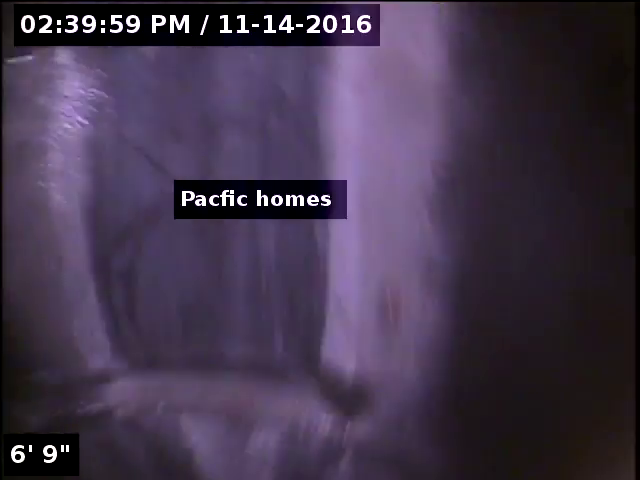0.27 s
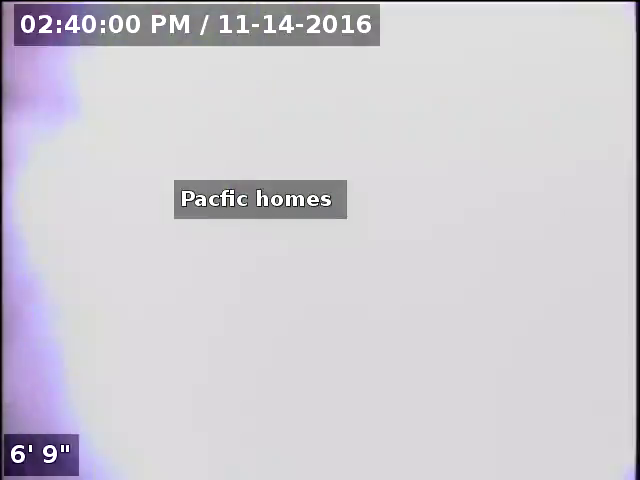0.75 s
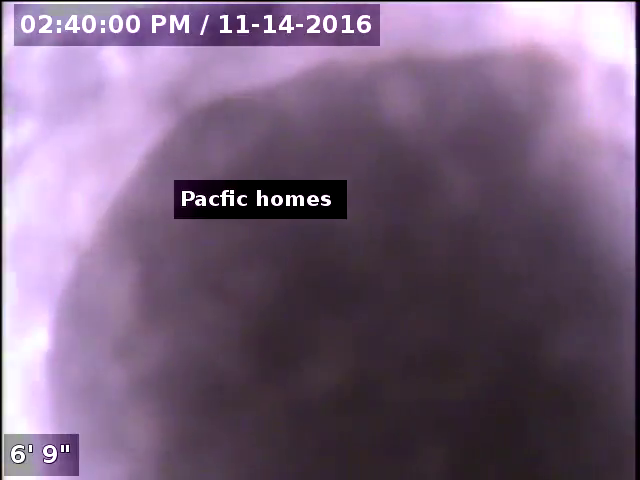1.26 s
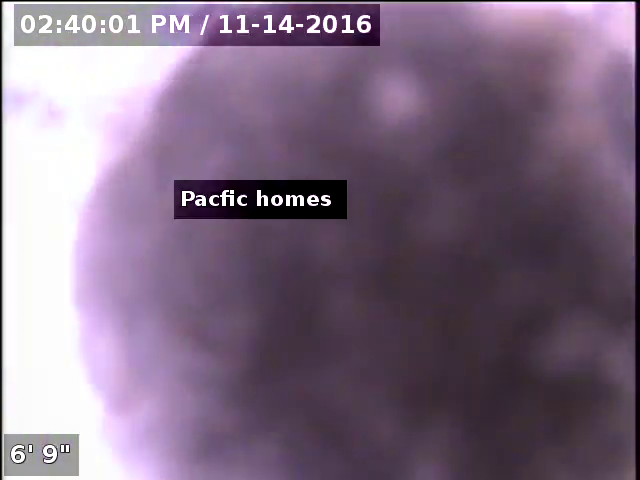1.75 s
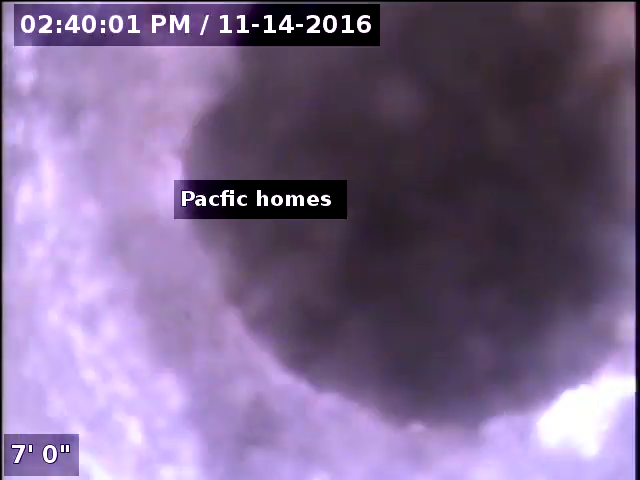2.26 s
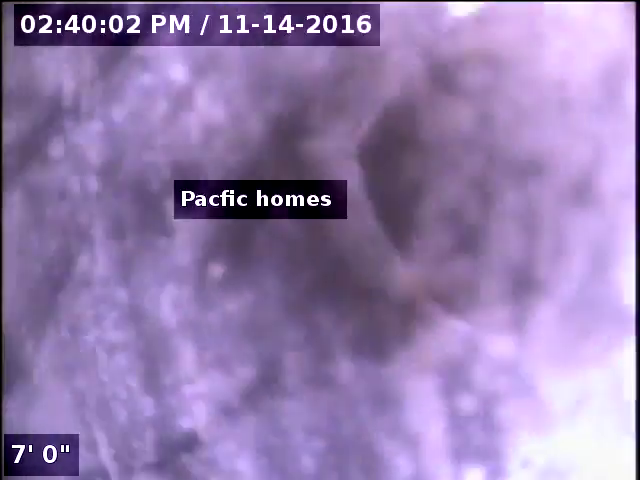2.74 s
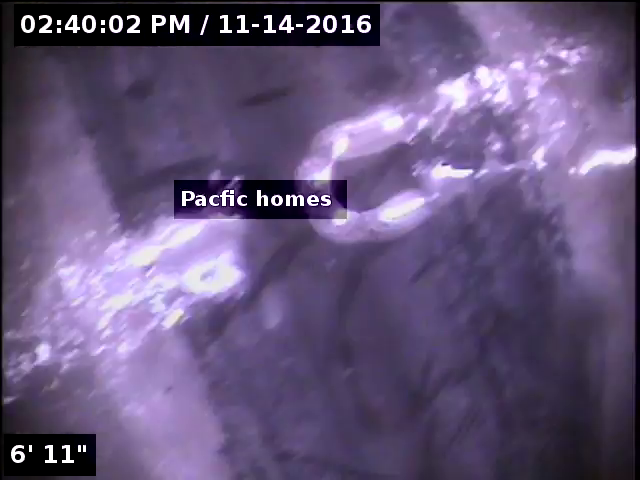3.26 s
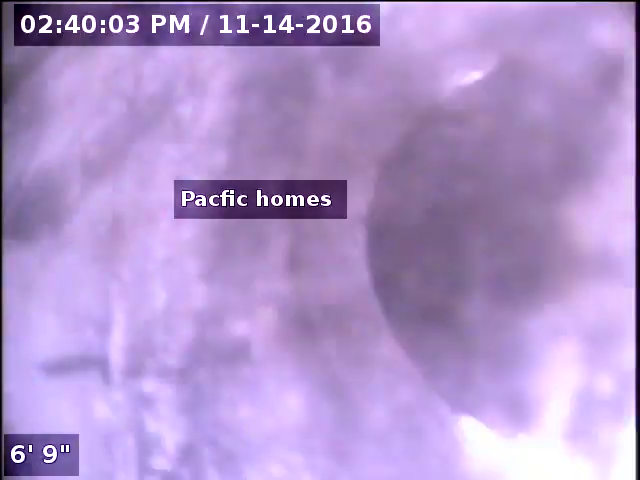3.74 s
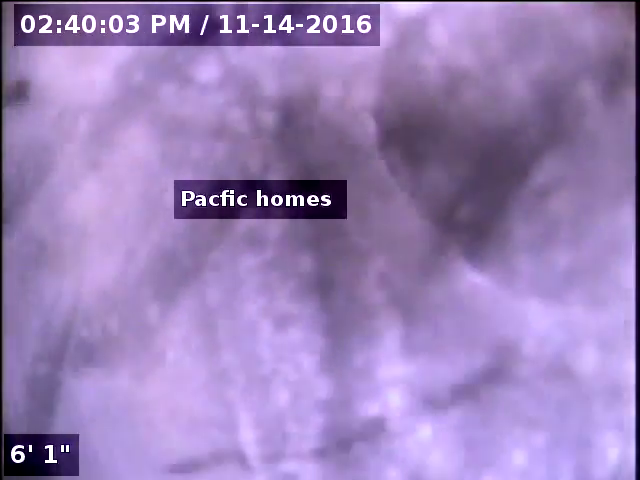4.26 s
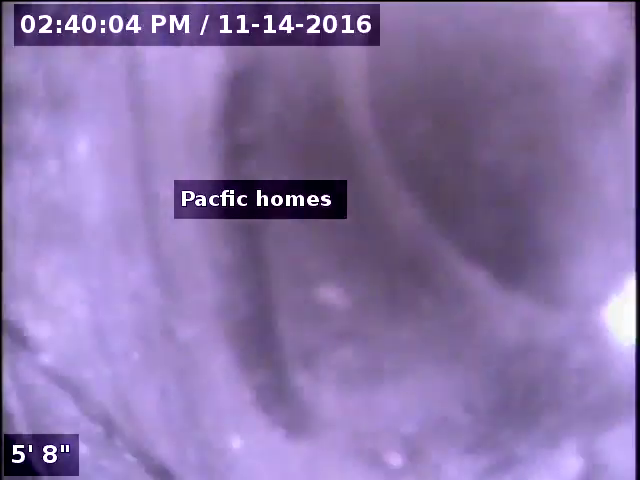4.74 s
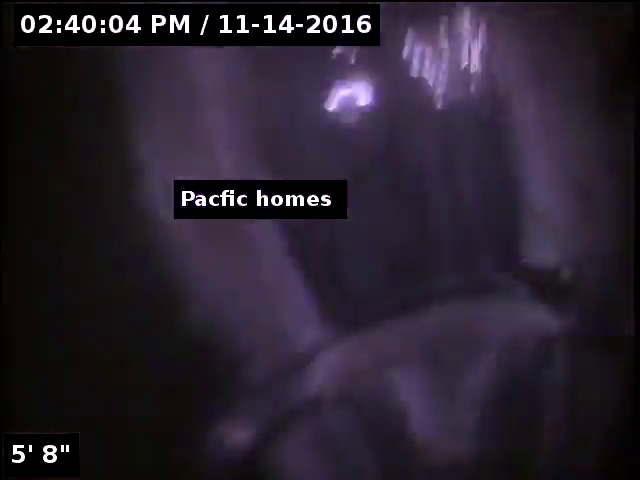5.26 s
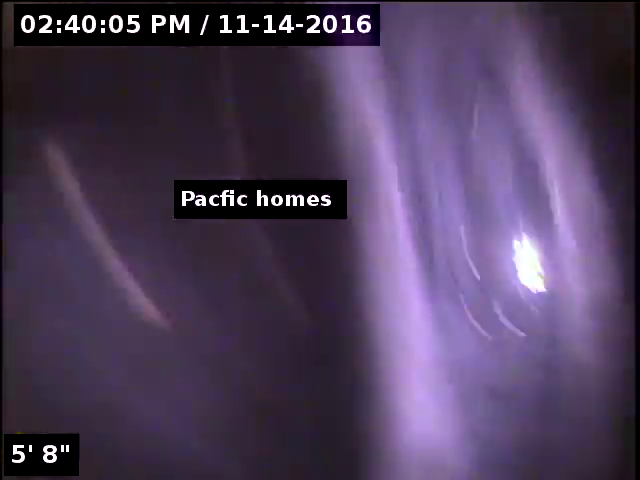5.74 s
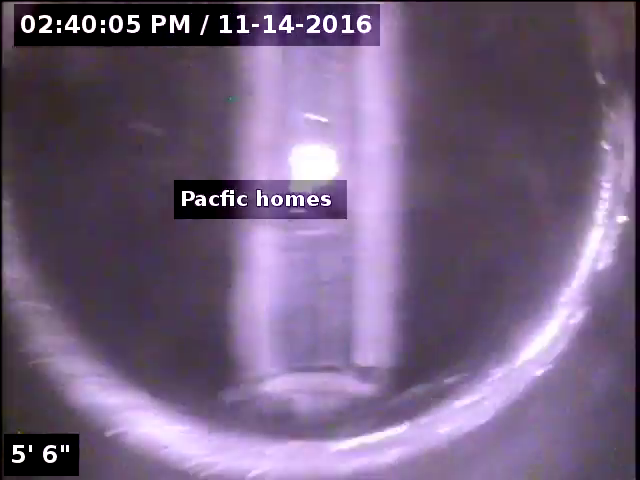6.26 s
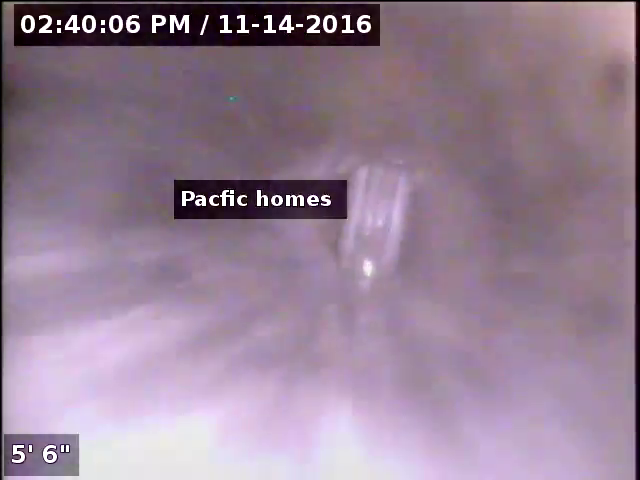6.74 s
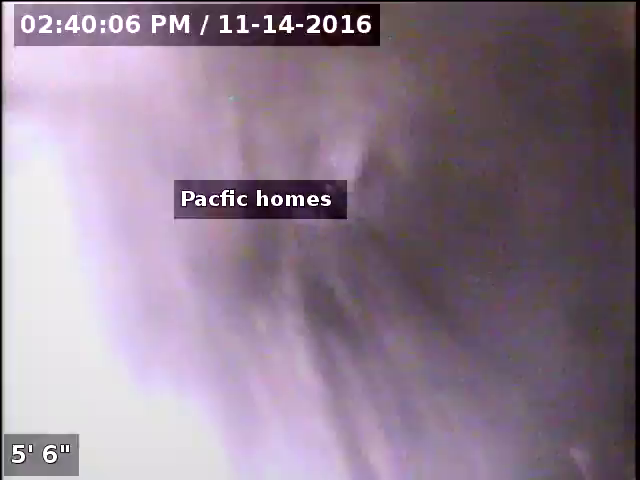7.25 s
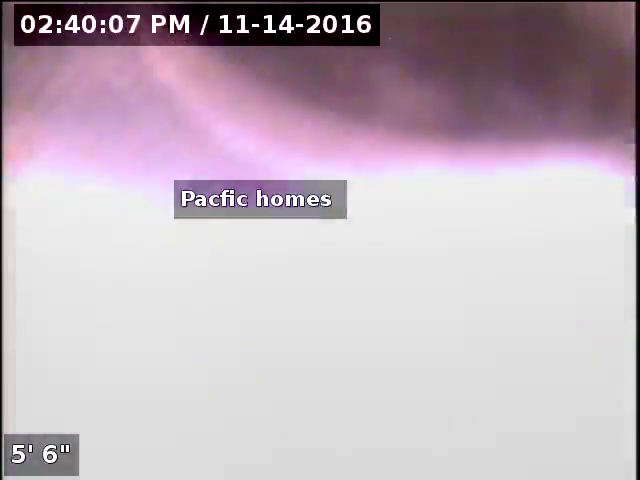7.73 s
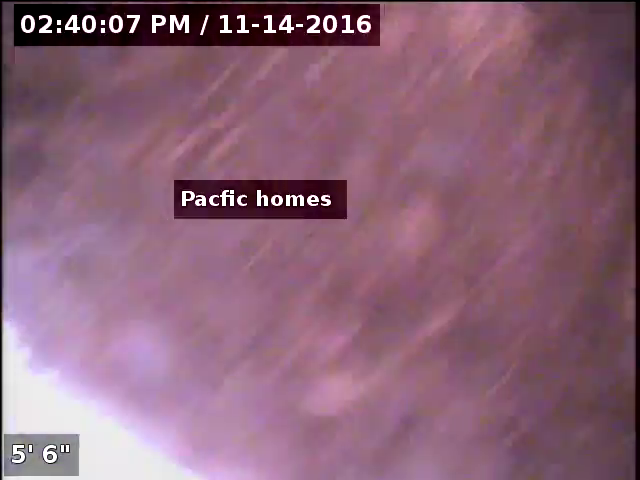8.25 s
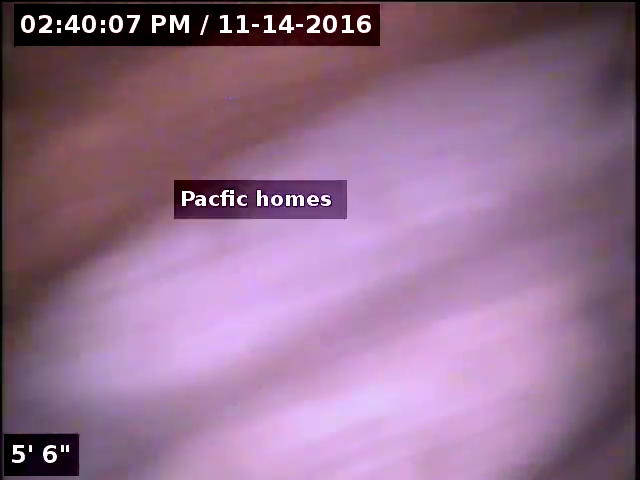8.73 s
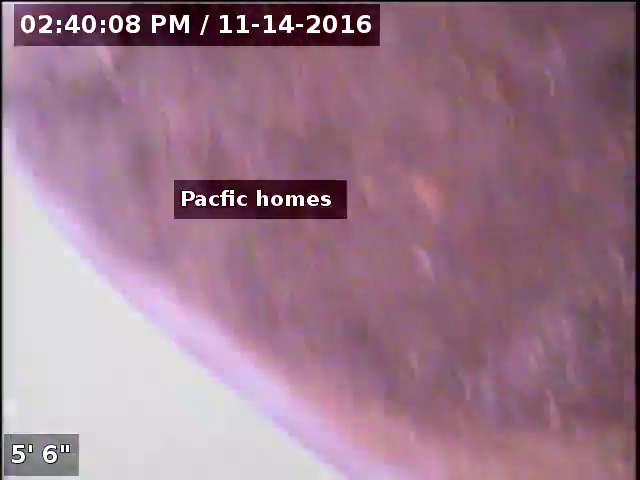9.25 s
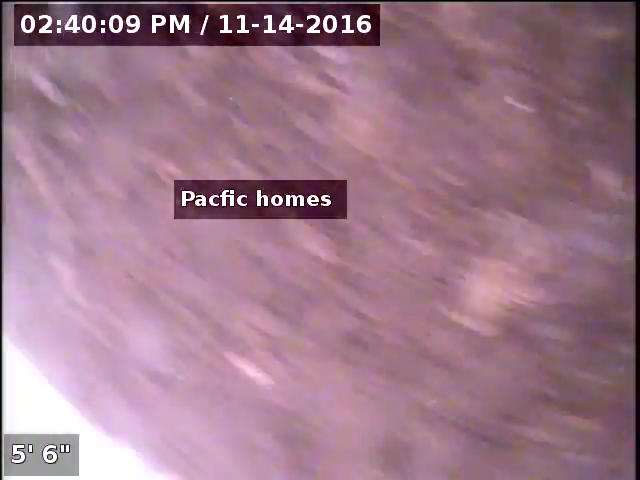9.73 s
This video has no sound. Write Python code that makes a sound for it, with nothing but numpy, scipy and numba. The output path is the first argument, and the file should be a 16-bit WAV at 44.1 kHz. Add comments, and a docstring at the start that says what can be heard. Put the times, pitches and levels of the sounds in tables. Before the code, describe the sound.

An inspection camera on a push cable is dragged through a drain pipe. It scrapes and rattles in short, uneven tugs, with sharp hollow knocks and small cable clicks over a faint low hum. Midway comes one longer, louder pull, a split-second dropout and a hard knock. The hardest knocks overload the cheap, dull microphone. Toward the end it thins to light rubbing, tiny squeaks and a faint hiss with a thin whine.

```python
"""Camera head dragged through a drain pipe

A camera head on a push cable is dragged back through a drain pipe and out into the open. Stick-slip
on grit excites the resonances of the head, the pipe wall and the air column. Knocks overload a cheap
microphone's input, the sound drops out once for a tenth of a second, and a faint hiss ends the scene."""
import sys
import numpy as np
from scipy import signal
from scipy.fft import rfft, irfft, next_fast_len
from scipy.io import wavfile
from scipy.ndimage import uniform_filter1d
from numba import njit

SR = 44100
rng = np.random.default_rng(int(sys.argv[2]) if len(sys.argv) > 2 else 0)


def transcribe(u):
    """Save the signal u as a 16-bit wav file named by the first command-line argument.

    u: samples, shape (n,) or (channels, n), limited to [-1, 1]; the rate is SR.
    q: integer samples, one column per channel.
    """
    v = np.clip(np.atleast_2d(u).T, -1, 1)
    q = np.round(v * 32767).astype(np.int16)
    wavfile.write(sys.argv[1], SR, q)


N = 440118

# Thin high whine. Each row: time in seconds, level in dB.
WHINE_LEVELS = [(0, -80), (4.5, -84.5), (5.3, -74), (7.8, -76), (8.1, -65.5), (8.5, -68), (8.9, -64),
                (9.25, -68), (9.6, -62.5), (9.98, -63.5)]
# Treble hiss, lower out in the open. Each row: time in seconds, level in dB.
HISS_LEVELS = [(0, -62), (3.3, -62.5), (5.5, -60), (7.8, -61.5), (8.1, -63.5), (9.98, -65)]
# Soft brushing. Each row: middle and half length in seconds, level in dB.
BRUSH_SWISHES = [(4.412, .04, -49), (5.37, 0.034, -52.5), (8.417, 0.077, -47), (9.048, 0.087, -49)]
# Rubbing squeaks. Each row: start and length in seconds, first pitch, last pitch and width in Hz,
# level in dB.
RUB_SQUEAKS = [(0.273, 0.051, 1690, 1570, 90, -44), (3.282, 0.11, 5200, 5150, 150, -66),
               (6.62, 0.11, 2310, 2210, 150, -50.5), (7.772, 0.055, 2570, 2610, 150, -52),
               (8.316, 0.11, 2180, 2350, 200, -53), (8.853, 0.17, 2170, 2390, 180, -60),
               (9.052, 0.093, 2410, 2600, 300, -46.5)]
# Bumps that set the air column humming. Each row: start in seconds, level in dB, pitch in Hz,
# 60 dB decay time in seconds.
AIR_BUMPS = [(0.447, -30, 210, 0.65), (0.499, -26.5, 212, 0.48), (0.627, -24, 225, 0.11),
             (0.762, -32, 217, 0.2), (1.053, -32, 205, 0.13), (1.244, -26, 174, 0.1),
             (1.499, -26.5, 229, 0.29), (1.655, -9.5, 207, 0.074), (2.013, -11.5, 198.3, 0.15),
             (2.463, -25, 170, 0.11), (2.529, -35.5, 219, 0.5), (2.965, -26, 232, 0.19),
             (3.703, -19.5, 176, 0.1), (4.795, -16.5, 220.5, 0.19), (4.817, -17.5, 222, 0.23),
             (6.086, -14.5, 216.5, 0.31), (7.564, -34, 201, 0.22), (7.872, -37.5, 207, 0.2),
             (9.232, -37, 213, 0.29)]
# Ticks of the cable. Each row: start in seconds, level in dB, centre in Hz, snap over click in dB.
CABLE_TICKS = [(2.4992, -31.5, 2080, -32), (3.2442, -34, 2180, -14), (4.1104, -27.5, 2160, -15),
               (4.1542, -29, 2180, -18), (4.7446, -26.5, 2040, -3), (4.9434, -43, 2600, -28),
               (5.1987, -39, 2030, -30), (5.6369, -20.5, 2570, -24), (5.9618, -25.5, 2210, -21),
               (6.4855, -27, 2470, -21), (7.5092, -28, 2270, -29), (8.0032, -52, 2930, -7),
               (8.1219, -42, 2160, -20), (8.7176, -45.5, 2200, -18)]
# Resonances of the camera head and of the grit. Each row: centre in Hz, width in Hz, gain in dB.
HEAD_MODES = [(314, 40, -0.5), (437, 276, -1.5), (646, 84, -1), (876, 140, -3.5), (1135, 200, -5.5),
              (1365, 81, -2.5)]
GRIT_MODES = [(1620, 400, -2), (2004, 210, -4), (2242, 185, -1), (2507, 250, -5), (3476, 460, -7.5)]
# Blows on the wall. Each row: start in seconds, ring level in dB, pitch in Hz,
# 60 dB decay time in seconds, crack over ring in dB.
WALL_KNOCKS = [(0.021, -29.5, 766, .07, -10), (0.482, -20.5, 985, 0.033, -17),
               (0.968, -30, 634, 0.059, -14.5), (1.048, -7, 1403, 0.043, -11), (1.164, -32, 538, .046, -1),
               (1.503, 5, 707, .04, -16), (1.654, -23, 679, .09, -32), (1.762, -28.5, 432, 0.058, -4.5),
               (1.974, -12, 720, 0.043, -19), (2.01, -13.5, 736, 0.036, -17),
               (2.022, -13.5, 1390, 0.029, -15), (2.327, -36.5, 876, 0.076, -12),
               (2.413, -36.5, 613, 0.048, -30.5), (2.462, -1.5, 839, 0.042, -5),
               (2.498, -14, 720, 0.026, -17), (2.711, -31.5, 460, .08, -26), (2.785, -28, 850, 0.14, -14),
               (2.96, -21, 825, .058, -9), (3.406, -31, 717, 0.11, -27), (3.7, -10.5, 670, 0.046, 1),
               (3.745, -15, 850, 0.042, -26.5), (3.891, -12, 1154, 0.071, -27),
               (4.013, -19.5, 1140, 0.088, -30), (4.049, -17.5, 671, 0.1, -21.5),
               (4.123, -12, 726, 0.049, -23.5), (4.516, -24.5, 457, 0.043, -0.5),
               (4.704, -28.5, 760, 0.15, -12), (4.797, 6.5, 796, .042, -9.5), (4.81, -16, 653, 0.05, -13.5),
               (4.945, -26, 593, 0.055, -4.5), (5.201, -33, 1140, 0.051, -5),
               (5.577, -1, 847, 0.021, -19.5), (5.637, -17.5, 578, 0.042, 0),
               (5.688, -12.5, 775, .04, -8.5), (5.734, -26, 850, .037, -30),
               (5.753, -24.5, 1087, 0.043, -36), (5.964, -25, 877, 0.035, -0.5),
               (6.029, -27, 1065, .04, -10), (6.058, 0, 858, 0.039, -6), (6.187, -33, 786, 0.13, -11),
               (7.112, -18.5, 594, 0.063, -20), (7.133, -19.5, 586, 0.053, -12.5),
               (7.54, -24, 643, 0.05, -30), (7.568, -15.5, 589, 0.042, -35),
               (7.634, -23.5, 650, 0.028, -9.5), (7.666, -26.5, 570, 0.04, -29),
               (7.696, -26.5, 577, 0.091, -29), (7.732, -25.5, 570, 0.042, -30),
               (7.821, -29.5, 643, .09, -21), (7.865, -33, 574, 0.089, -16.5),
               (8.587, -33.5, 667, 0.028, -22), (8.681, -28, 540, .04, -34), (8.8, -35, 690, 0.061, -28),
               (9.227, -37.5, 1140, .05, -5.5)]
# Constant light rubbing. Each row: time in seconds, chatter level in dB, grit over chatter in dB.
LIGHT_RUBBING = [(0, -48, -10.5), (.4, -42, -6.5), (0.998, -48.5, -12), (1.702, -42.5, -6.5),
                 (2.301, -49, -8), (2.651, -48.5, -11), (3.302, -56.5, -6.5), (4.5, -47, -17.5),
                 (4.7, -44, -13), (5.301, -46, -9), (5.55, -62.5, 7.5), (5.899, -53.5, -1),
                 (6.4, -52.5, -10), (7.201, -43.5, -9.5), (7.799, -44, -11), (7.95, -59, -11),
                 (8.7, -50, -10.5), (9.98, -63.5, -21)]
# Short tugs on the cable. Each row: middle and half length in seconds, chatter level in dB,
# grit over chatter in dB, wall resonance in Hz, wall ring over head ring in dB.
CABLE_TUGS = [(0.034, 0.058, -41, -4.5, 748, -11), (0.258, 0.017, -51, 6, 621, 14),
              (0.585, 0.11, -30, -3.5, 886, -1.5), (0.769, 0.066, -32.5, -5, 588, -9),
              (0.96, 0.11, -39, -7.5, 835, -5), (1.053, 0.026, -18, -3.5, 936, 3.5),
              (1.164, 0.069, -32, -7.5, 600, -17), (1.383, 0.061, -31.5, -10, 1248, -5.5),
              (1.627, 0.071, -32.5, -11, 696, 0), (1.784, 0.021, -34, -7, 558, -24),
              (1.876, 0.043, -43, -19, 786, 7), (1.988, 0.12, -31, -11.5, 717, -0.5),
              (2.24, 0.058, -30.5, -11, 550, -10), (2.489, 0.033, -26, -17, 827, -2),
              (2.793, 0.066, -30.5, -17.5, 765, -5.5), (2.967, 0.02, -34.5, -29, 817, -2),
              (3.117, 0.141, -37.5, -17, 755, 3.5), (3.5, 0.079, -28.5, -20, 753, 1),
              (4.818, 0.11, -29, -12, 772, -8), (5.078, 0.064, -39.5, -11.5, 549, -12),
              (5.207, 0.045, -38.5, -36, 710, 5), (5.38, 0.051, -46, 1, 1272, 2.5),
              (5.772, 0.2, -40.5, -11, 654, 12.5), (6.066, 0.048, -40, -3.5, 938, -17),
              (6.118, 0.13, -41, -17, 860, -5), (6.671, 0.15, -39.5, -8, 649, -1.5),
              (6.876, 0.051, -33.5, -10.5, 1170, -10), (7.009, 0.17, -51.5, -4, 602, -17),
              (7.369, 0.067, -51.5, 0.5, 645, -8), (7.459, 0.051, -38.5, -10.5, 559, 7.5),
              (7.845, 0.056, -46.5, -9, 620, -1), (8.144, 0.068, -53, -12, 803, -9),
              (8.274, 0.074, -48.5, -18, 550, -4), (8.583, 0.047, -49, -7, 680, -23),
              (8.75, 0.07, -47, -32, 552, 5), (9.238, 0.028, -41.5, -12, 616, -4),
              (9.314, 0.08, -48.5, -16, 577, 0), (9.524, 0.077, -52.5, -9.5, 614, 0),
              (9.944, 0.067, -53, -16.5, 636, 5.5)]
# The one long pull. Each row: time in seconds, chatter level in dB, grit over chatter in dB,
# wall resonance in Hz.
LONG_PULL = [(3.585, -38, -16, 788), (3.681, -22.5, -16, 741), (3.729, -22.5, -14.5, 818),
             (3.881, -24.5, -10.5, 813), (4.025, -20.5, -14.5, 727), (4.139, -23.5, -15, 774),
             (4.201, -23.5, -13, 801), (4.347, -26, -20, 758), (4.5, -59.5, -5, 737)]
# Overall tone colour with a deep notch at 4 kHz and a dull top. Each row: frequency in Hz,
# gain in dB (capped at 0 when applied).
TONE_COLOUR = [(20, 34), (3000, 5.5), (3600, -13), (3900, -19.5), (4000, -64), (4100, -22), (4400, -9.5),
               (6500, 6), (7700, -2.5), (8300, -17.5), (9000, -69.5)]

WHINE_HZ, WHINE_WIDTH_HZ, FLOOR_DB = 5250, 330, -57.5
TICK_T60_S, TICK_WIDTH_HZ, TICK_SNAP_S = 0.023, 640, .0015
BUMP_RISE_S, KNOCK_RISE_S = 0.0015, 0.00014
PING_RANGE_HZ, RATTLE_DB_PER_CRACK_DB, SNAP_OVER_CRACK_DB = (1736, 2428), 0.36, -17.5
RUB_WALL_HZ, RUB_WALL_DB, PULL_WALL_DB = 704, 0, 16  # pressed hard, the wall rings well above the head
HISS_FLICKER_DB, HISS_OVER_GRIT_DB, HISS_OVER_SWISH_DB = 1, -18, -1
AIR_HZ, AIR_WIDTH_HZ, AIR_FLICKER_DB = 207, 11.4, 1.5
AIR_OVER_HEAD_DB, RUMBLE_OVER_HEAD_DB = -4, -34.5
DROPOUT_S, TOP_HZ = (4.538, 4.644), 8650
LN_1000 = np.log(1000)  # 60 dB of decay


def undb(db):
    """Amplitude ratio of a level; undb(2 * db) is the power ratio."""
    return 10 ** (np.asarray(db) / 20)


def unit(x):
    """Normalisation to an RMS of 1."""
    return x / np.sqrt(np.mean(x ** 2))


@njit
def resonator(x, hz, width):
    """Second-order resonance in state-variable form, with gain 1 at its centre."""
    y, band_state, low_state = np.empty(len(x)), 0., 0.
    for i in range(len(x)):
        g, damping = np.tan(np.pi * hz[i] / SR), width / hz[i]
        v = (band_state + g * (x[i] - low_state)) / (1 + g * (g + damping))
        band_state, low_state = 2 * v - band_state, low_state + 2 * g * v
        y[i] = damping * v
    return y


def band(x, hz, width):
    """Band-pass about a steady or moving centre; width is in Hz."""
    return resonator(x, hz * np.ones(len(x)), 1. * width)


def steep_band(x, hz, width):
    """Two band-passes in cascade give steeper skirts; the result has an RMS of 1."""
    return unit(band(band(x, hz, width), hz, width))


def body(x, modes):
    """Modal superposition at an RMS of 1: the same jolts push each mode in its own direction."""
    push = rng.choice([-1., 1.], len(x))
    return unit(sum(undb(db) * band(band(x * np.roll(push, k), hz, width), hz, 3 * width)
                    for k, (hz, width, db) in enumerate(modes)))


def wander(rate):
    """Linear ramps between random values, rate times a second, with a spread near 1."""
    hold = int(SR / rate)
    return 1.24 * uniform_filter1d(np.repeat(rng.standard_normal(N // hold + 1), hold), hold)[:N]


def swell(t, middle, half):
    """Power envelope shaped as a bell with a slightly flattened top."""
    return np.exp(-2 * np.abs((t - middle) / half) ** 2.9)


def input_noise():
    """The noise floor of the input, weighted towards the bass."""
    return undb(FLOOR_DB) * unit(band(rng.standard_normal(N), hz=130, width=270))


def whine():
    """Narrow-band noise is heard as a faint pitch, which wavers with the band's centre."""
    level_db = np.interp(np.arange(N) / SR, *np.transpose(WHINE_LEVELS))
    hz = WHINE_HZ * (1 + .008 * wander(7))
    return undb(level_db) * steep_band(rng.standard_normal(N), hz, WHINE_WIDTH_HZ)


def squeaks():
    """Rapid stick-slip: a smooth surface catches and lets go in a brief breathy glide."""
    out = np.zeros(N)
    for start, length, first_hz, last_hz, width, db in RUB_SQUEAKS:
        i, size = int(start * SR), int(length * SR)
        glide = steep_band(rng.standard_normal(size), np.linspace(first_hz, last_hz, size), width)
        out[i:i + size] += undb(db) * np.sqrt(np.hanning(size)) * glide
    return out


def bumps():
    """Free vibration of the air column: each bump leaves a hollow, exponentially damped note."""
    out, t = np.zeros(N + SR), np.arange(SR // 2) / SR
    for start, db, hz, t60 in AIR_BUMPS:
        note = np.sin(2 * np.pi * hz * t) * np.exp(-LN_1000 * t / t60)
        i = int(start * SR)
        out[i:i + len(t)] += undb(db) * note * (1 - np.exp(-t / BUMP_RISE_S))
    return out[:N]


def ticks():
    """A short transient has a wide spectrum: the cable's clicks are only loosely pitched."""
    out, t = np.zeros(N + SR), np.arange(SR // 20) / SR
    for start, db, hz, snap_db in CABLE_TICKS:
        noise = rng.standard_normal((2, len(t)))
        click = unit(band(noise[0], hz, TICK_WIDTH_HZ)) * np.exp(-LN_1000 * t / TICK_T60_S)
        snap = undb(snap_db) * unit(band(noise[1], hz=6000, width=5000)) * np.exp(-t / TICK_SNAP_S)
        i = int(start * SR)
        out[i:i + len(t)] += undb(db) * (click + snap)
    return out[:N]


def knocks():
    """Impact excitation: each blow rings the wall, rattles the head and cracks with a high ping."""
    out, t = np.zeros(N + SR), np.arange(SR // 6) / SR
    for start, db, hz, t60, crack_db in WALL_KNOCKS:
        noise = rng.standard_normal((3, len(t)))
        # the ring holds briefly, like an overloaded knock, then dies away quickly
        ring = np.sin(2 * np.pi * hz * t) * np.exp(-LN_1000 * (t / t60) ** 1.15)
        rattle = body(noise[0], HEAD_MODES) * np.exp(-LN_1000 * t / (1.3 * t60))
        ping = 0.55 * np.sin(2 * np.pi * rng.uniform(*PING_RANGE_HZ) * t)
        crack = (body(noise[1], GRIT_MODES) + ping) * np.exp(-LN_1000 * t / (0.79 * t60))
        snap = unit(band(noise[2], hz=5900, width=9000)) * np.exp(-LN_1000 * (t / (0.5 * t60)) ** 2)
        blow = ring + undb(RATTLE_DB_PER_CRACK_DB * crack_db) * rattle
        blow += undb(crack_db) * (crack + undb(SNAP_OVER_CRACK_DB) * snap)
        i = int(start * SR)
        out[i:i + len(t)] += undb(db) * (1 - np.exp(-t / KNOCK_RISE_S)) * blow
    return out[:N]


def drag_controls():
    """Incoherent sources add in power; the wall's pitch and ring are power-weighted means."""
    t = np.arange(0, N, 64) / SR
    # each movement: chatter power, grit in dB, wall resonance in Hz, wall ring in dB
    times, db, grit_db = np.transpose(LIGHT_RUBBING)
    moves = [(undb(2 * np.interp(t, times, db)), np.interp(t, times, grit_db), RUB_WALL_HZ, RUB_WALL_DB)]
    for middle, half, db, grit_db, hz, ring_db in CABLE_TUGS:
        moves.append((undb(2 * db) * swell(t, middle, half), grit_db, hz, ring_db))
    times, db, grit_db, hz = np.transpose(LONG_PULL)
    pull = undb(2 * np.interp(t, times, db)) * (t > times[0]) * (t < times[-1])
    moves.append((pull, np.interp(t, times, grit_db), np.interp(t, times, hz), PULL_WALL_DB))

    chatter = sum(power for power, _, _, _ in moves)
    grit = sum(power * undb(2 * db) for power, db, _, _ in moves)
    wall_hz = sum(power * hz for power, _, hz, _ in moves) / chatter
    wall_db = sum(power * db for power, _, _, db in moves) / chatter
    swish = sum(undb(2 * db) * swell(t, middle, half) for middle, half, db in BRUSH_SWISHES)
    hiss_db = np.interp(t, *np.transpose(HISS_LEVELS)) + HISS_FLICKER_DB * wander(6)[::64]
    hiss = undb(2 * hiss_db) + undb(2 * HISS_OVER_GRIT_DB) * grit + undb(2 * HISS_OVER_SWISH_DB) * swish
    curves = (chatter ** .5, grit ** .5, swish ** .5, hiss ** .5, wall_hz, wall_db)
    return [np.interp(np.arange(N) / SR, t, curve) for curve in curves]


def slips(rate, spread_db, judder_db):
    """Stick-slip friction: a random train of uneven impulses, swelling and fading with the judder of the cable."""
    occurs = rng.random(N) < rate / SR
    strength = undb(spread_db * np.minimum(rng.exponential(size=N), 4))
    return occurs * strength * rng.choice([-1., 1.], N) * undb(judder_db * wander(45))


def drag():
    """Forced vibration: slips drive the head, wall and air column; finer grit crackles and hisses."""
    chatter_gain, grit_gain, swish_gain, hiss_gain, wall_hz, wall_db = drag_controls()
    slip = slips(rate=2500, spread_db=3.0, judder_db=2.0)
    upper_hz = 1.444 * wall_hz  # second mode of the wall
    lower_mode = band(band(slip, wall_hz, 260), wall_hz, 260)
    upper_mode = band(band(slip, upper_hz, 220), upper_hz, 220)
    chatter = body(slip, HEAD_MODES) + undb(wall_db) * unit(lower_mode + .55 * upper_mode)
    rumble = undb(RUMBLE_OVER_HEAD_DB) * unit(band(slip, hz=130, width=370))
    head_gain = chatter_gain / np.sqrt(1 + undb(2 * wall_db))  # the head's share, which drives the air
    air = unit(band(head_gain * undb(AIR_FLICKER_DB * wander(8)) * slip, AIR_HZ, AIR_WIDTH_HZ))
    air_gain = undb(AIR_OVER_HEAD_DB) * np.sqrt(np.mean(head_gain ** 2))
    fine_slip = slips(rate=5500, spread_db=-1.5, judder_db=4.0)
    grit = body(fine_slip + 0.63 * slip, GRIT_MODES)
    hiss = steep_band(unit(fine_slip) + 5.8 * rng.standard_normal(N), hz=5300, width=4400)
    swish = steep_band(rng.standard_normal(N), hz=2550, width=3900)
    treble = grit_gain * grit + swish_gain * swish + hiss_gain * hiss
    return head_gain * (chatter + rumble) + air_gain * air + treble


def scene():
    """Linear superposition of all sources in one channel."""
    return (drag() + knocks() + ticks() + bumps() + squeaks() + whine() + input_noise())[None]


def record(dry):
    """Asymmetric saturation, then a tone colour notched at 4 kHz, one dropout and a low-pass."""
    x = dry[0]
    x = x + 1.08 * x ** 2 / (1 + np.abs(x))  # the preamp stretches positive swings, squeezes negative
    # the input flattens both sides, the negative one earlier; the imbalance adds a low thump
    ceiling = np.where(x > 0, .84, .62)
    x = x / (1 + np.abs(x / ceiling) ** 6) ** (1 / 6)
    size = next_fast_len(N + SR)
    bin_hz = np.arange(size // 2 + 1) * SR / size
    hz, db = np.transpose(TONE_COLOUR)
    colour_db = np.interp(np.log(bin_hz + 1), np.log(hz), np.minimum(db, 0))
    x = irfft(rfft(x, size) * undb(colour_db), size)[:N]
    t = np.arange(N) / SR
    x = x * ((t < DROPOUT_S[0]) | (t > DROPOUT_S[1]))
    return signal.sosfilt(signal.ellip(10, .2, 80, TOP_HZ, fs=SR, output="sos"), x)[None]


dry = scene()
out = record(dry)
transcribe(out)
```